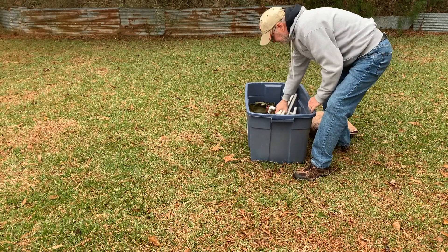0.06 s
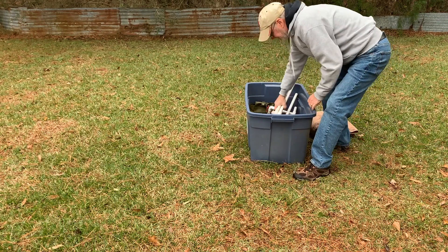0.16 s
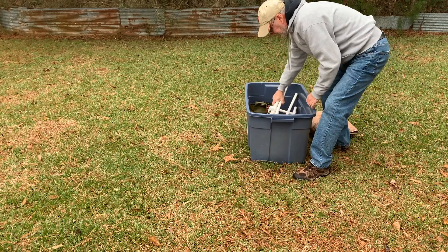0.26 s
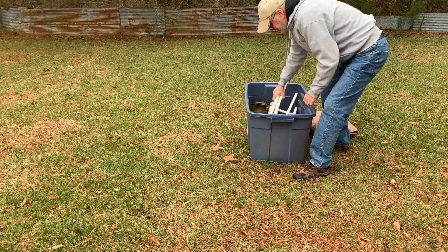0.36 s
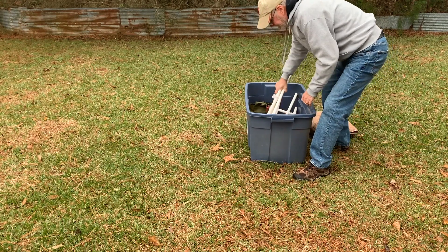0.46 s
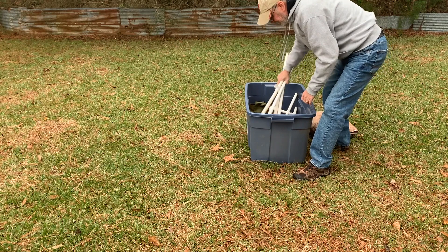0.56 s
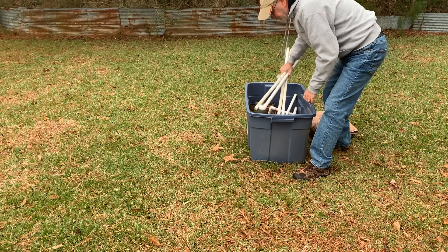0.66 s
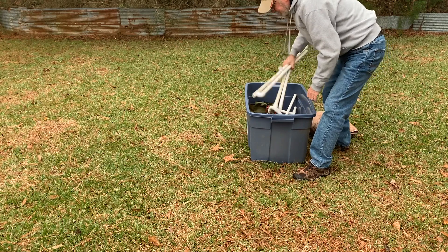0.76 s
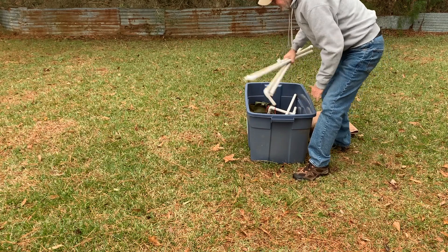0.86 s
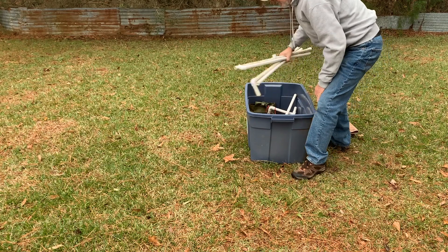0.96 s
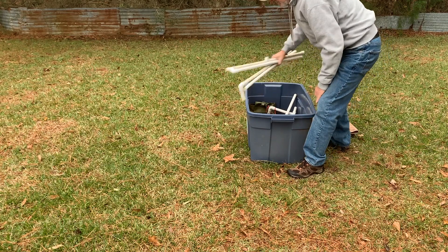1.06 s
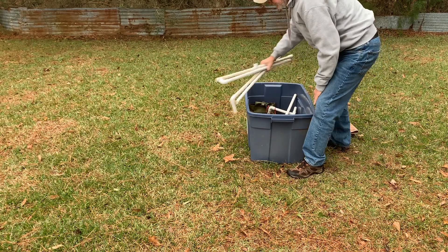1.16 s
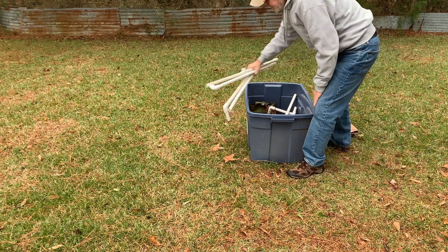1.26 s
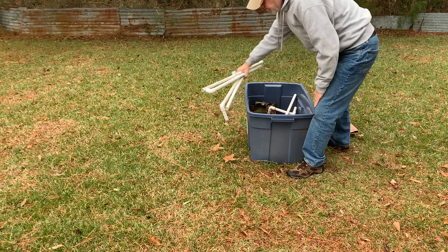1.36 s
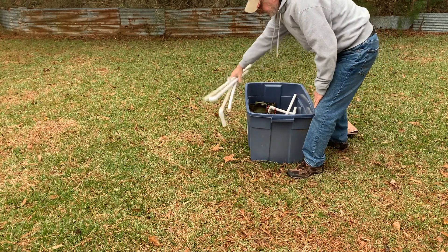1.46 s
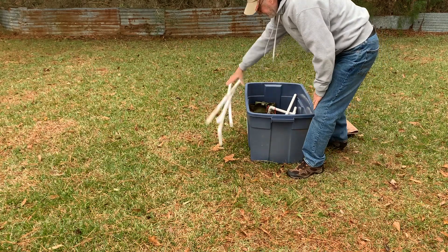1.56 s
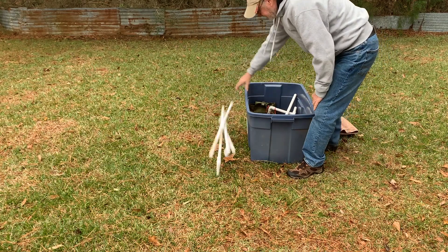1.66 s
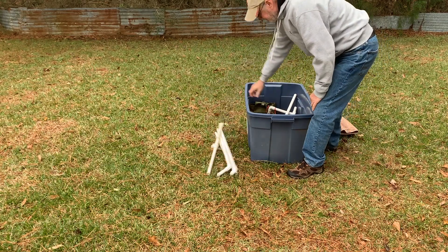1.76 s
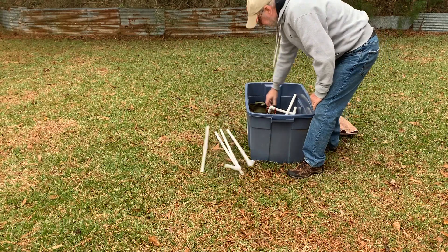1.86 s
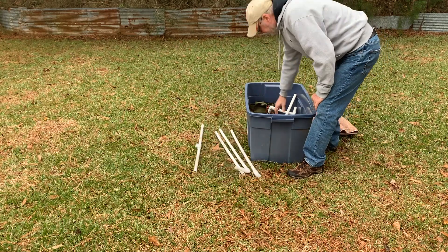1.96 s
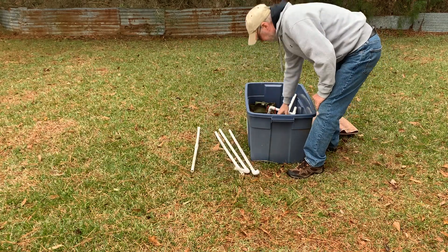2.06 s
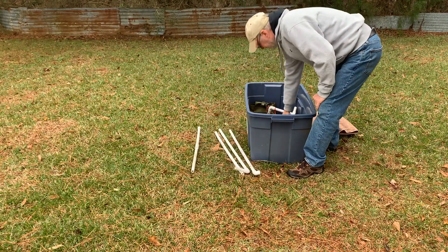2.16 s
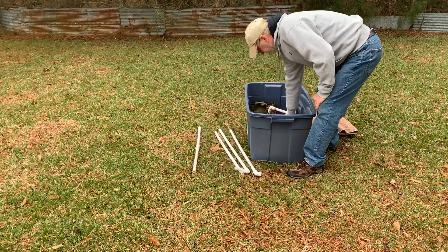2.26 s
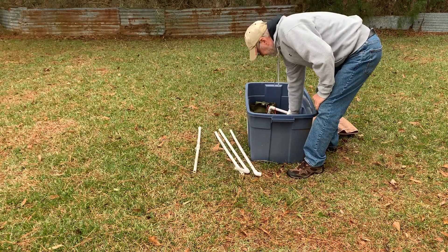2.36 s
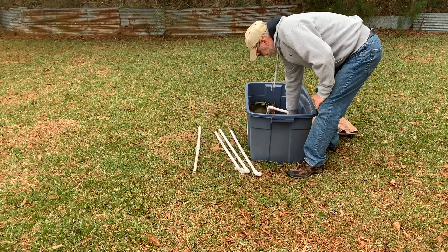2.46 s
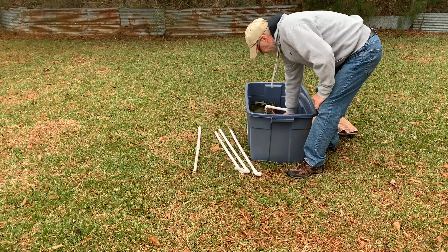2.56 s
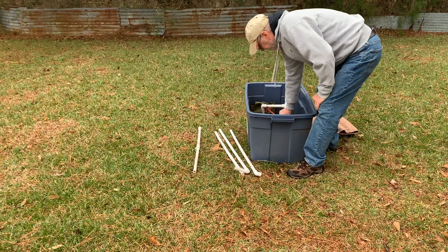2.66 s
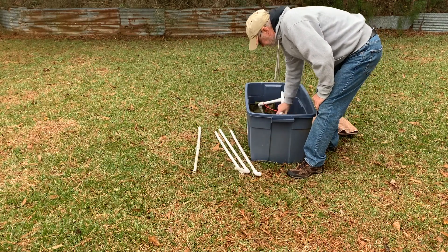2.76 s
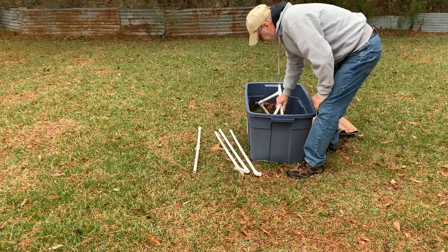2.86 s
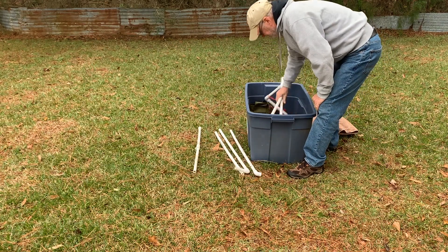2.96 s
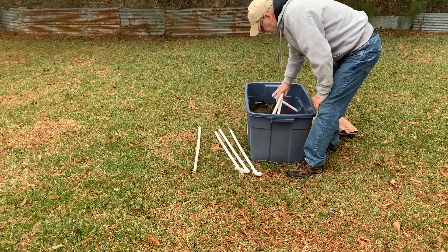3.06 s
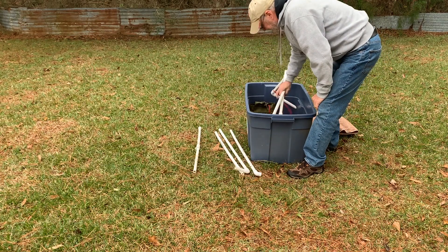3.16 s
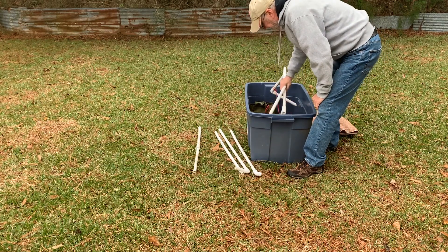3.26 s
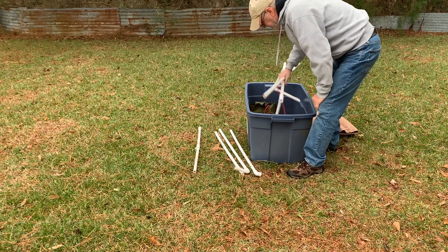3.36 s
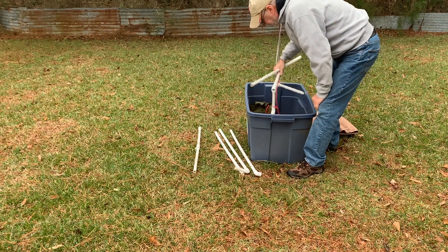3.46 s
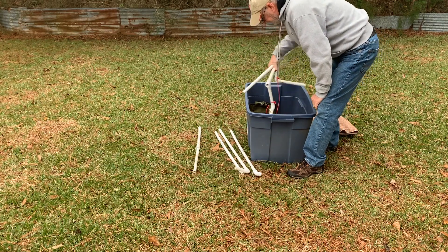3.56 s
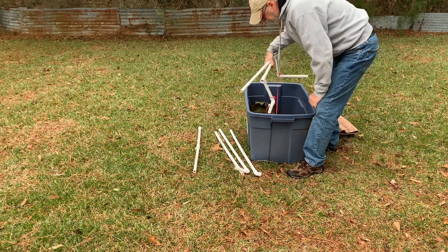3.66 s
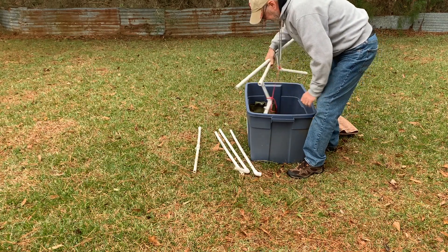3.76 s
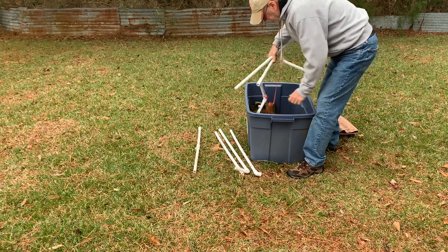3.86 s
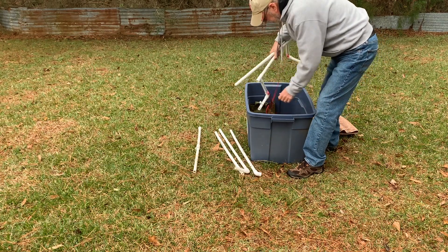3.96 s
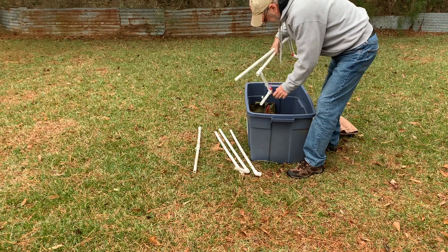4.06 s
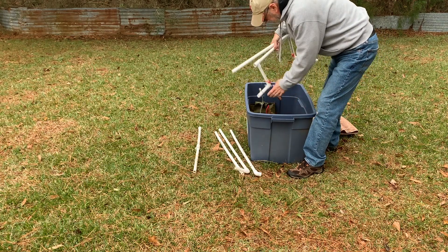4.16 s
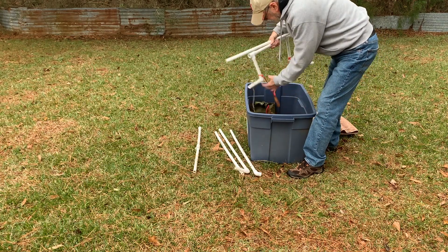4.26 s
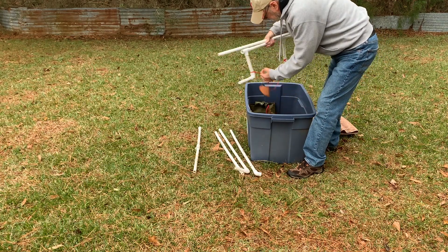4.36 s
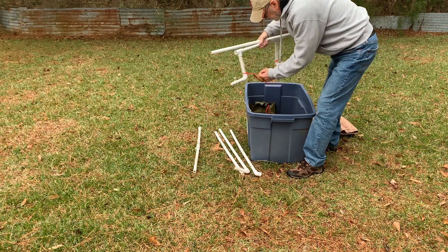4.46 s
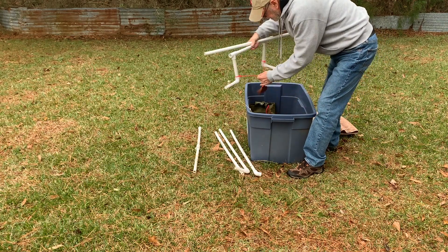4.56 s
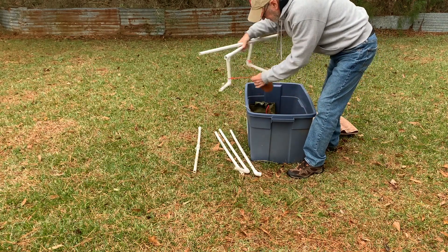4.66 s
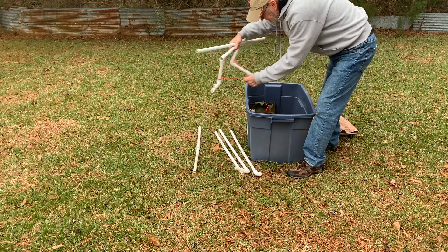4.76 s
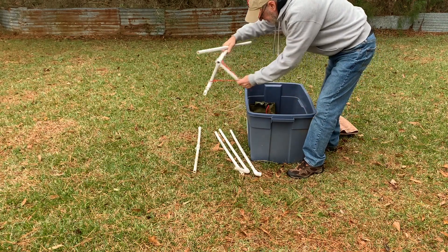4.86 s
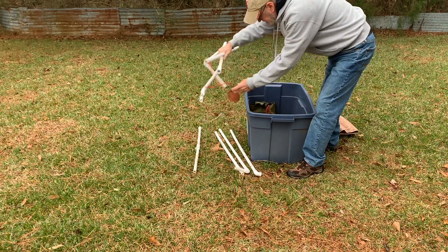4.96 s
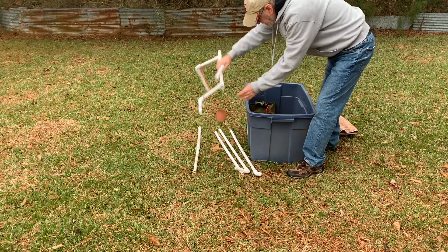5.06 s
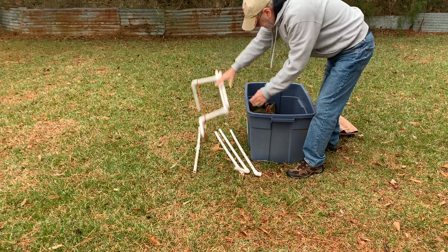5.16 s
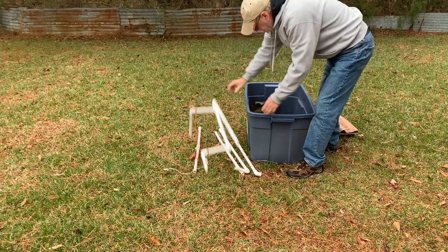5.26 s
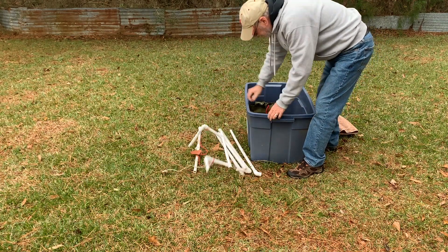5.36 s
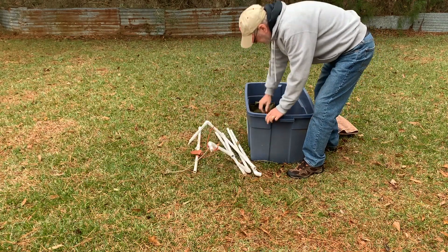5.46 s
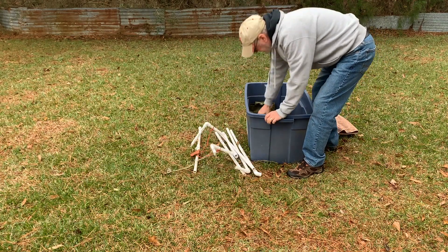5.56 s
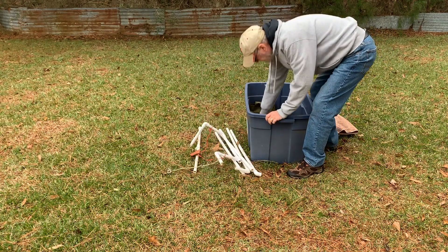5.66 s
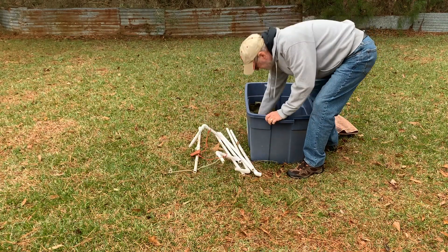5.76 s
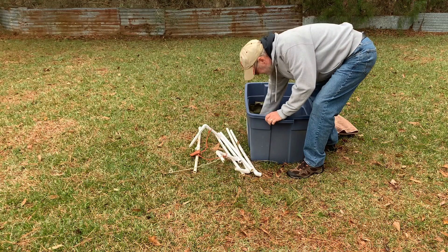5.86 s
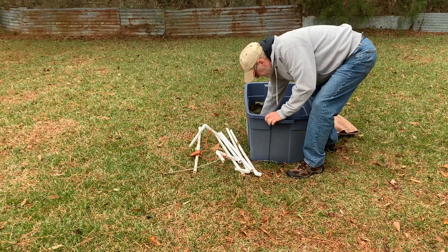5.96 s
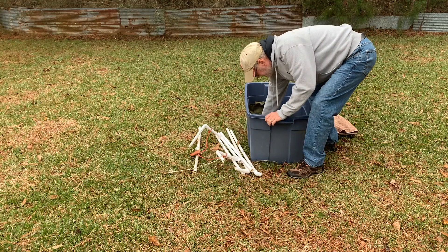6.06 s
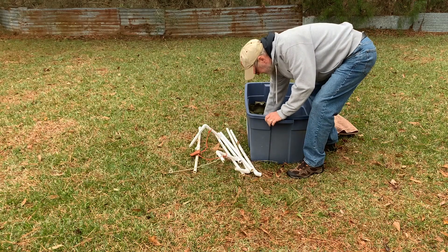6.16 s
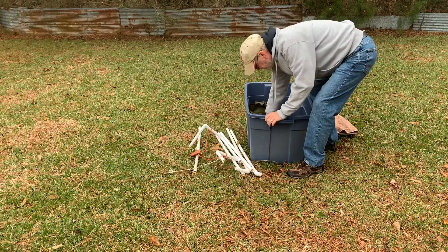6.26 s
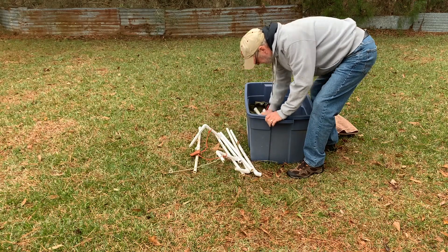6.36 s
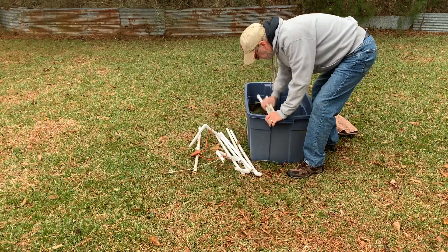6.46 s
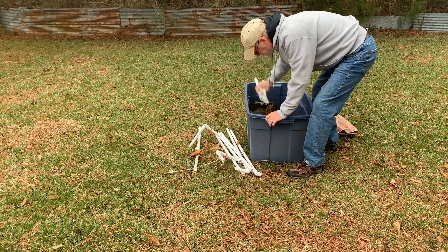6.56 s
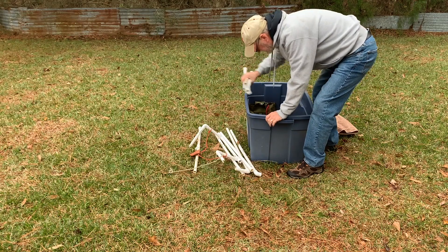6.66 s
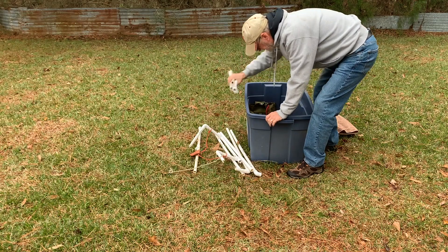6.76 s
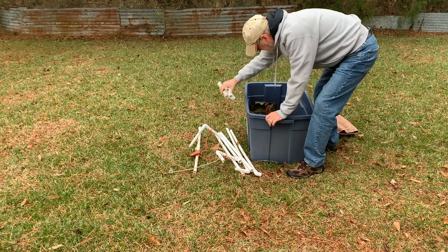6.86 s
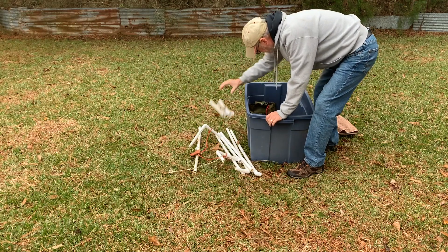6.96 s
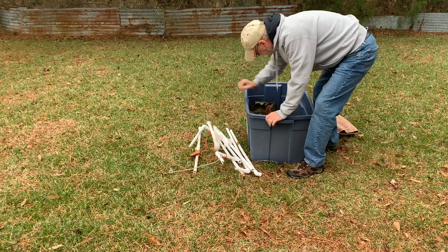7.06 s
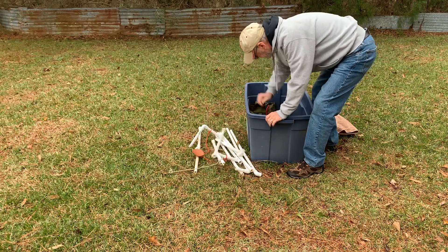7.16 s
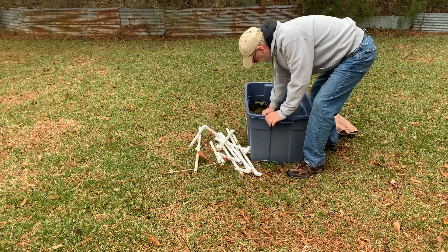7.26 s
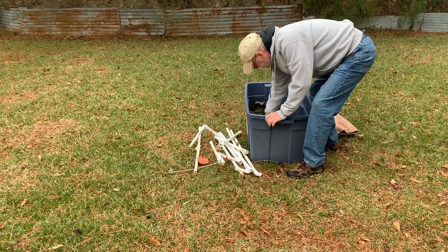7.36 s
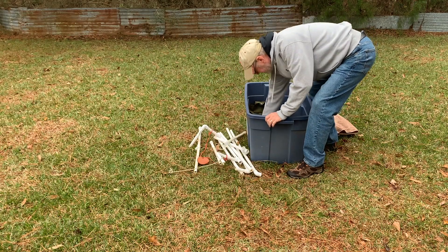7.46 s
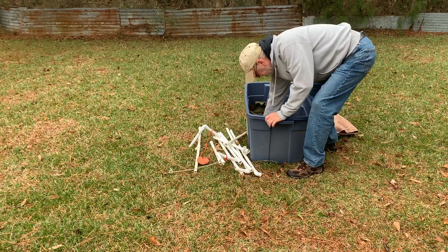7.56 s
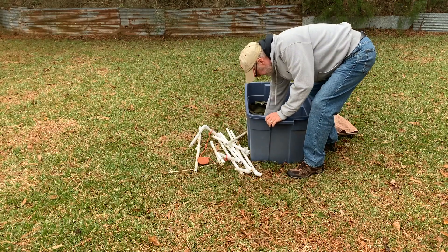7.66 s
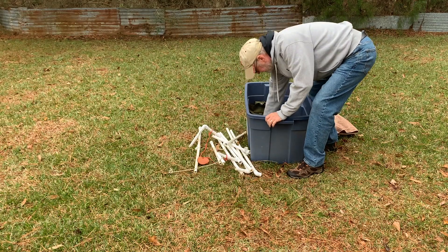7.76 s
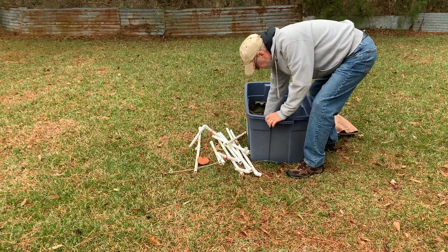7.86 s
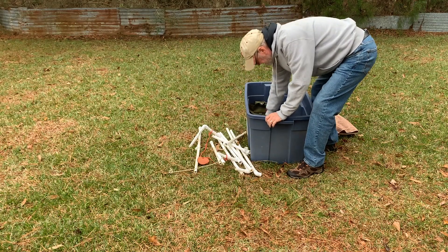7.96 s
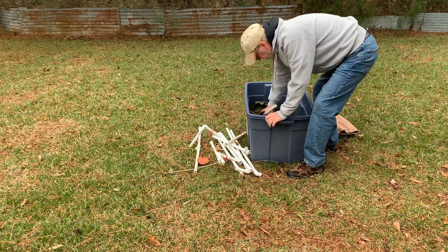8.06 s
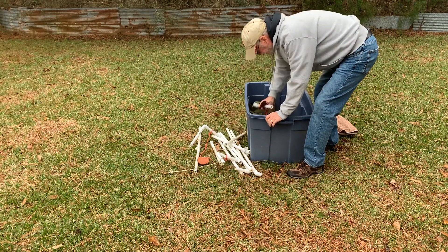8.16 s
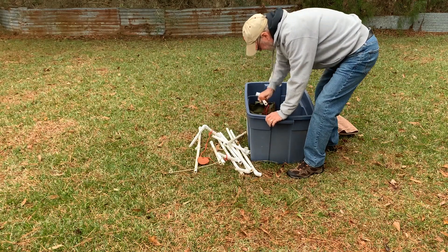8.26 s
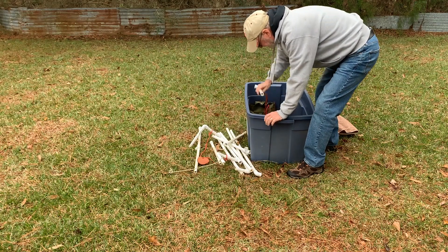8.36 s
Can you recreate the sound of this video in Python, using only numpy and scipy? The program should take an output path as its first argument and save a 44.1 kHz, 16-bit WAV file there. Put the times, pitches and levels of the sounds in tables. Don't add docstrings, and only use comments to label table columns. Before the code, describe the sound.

Plastic pipes clack and scrape inside a booming plastic tub, then three tosses clatter onto a lawn in a quiet yard with faint bird whistles.

```python
import sys
import numpy as np
from scipy import signal
from scipy.fft import rfft, irfft, next_fast_len
from scipy.io import wavfile

SR = 44100
rng = np.random.default_rng(int(sys.argv[2]) if len(sys.argv) > 2 else 0)


def gain_from_decibels(decibels):
    exponent = np.asarray(decibels, float) / 20
    return 10 ** exponent


def dump_mix(stems):
    frames = np.atleast_2d(stems).T
    limited = np.clip(frames, -1, 1)
    pcm = np.round(limited * 32767).astype(np.int16)
    wavfile.write(sys.argv[1], SR, pcm)


N = 371763
LEFT_RIGHT = np.array([[1], [-1]])


def rms_one(x):
    return x / np.sqrt(np.mean(x ** 2) + 1e-20)


def at_hz(points, hz):
    p = np.array(points, float)
    return np.interp(np.log(hz + 10), np.log(p[:, 0] + 10), p[:, 1])


def band(x, low_hz, high_hz, order=2):
    return signal.sosfilt(signal.butter(order, [low_hz, high_hz], "band", fs=SR, output="sos"), x)


def ring(x, hz, t60_s):
    r = gain_from_decibels(-60 / (max(t60_s, 1e-3) * SR))
    w = 2 * np.pi * hz / SR
    return signal.lfilter([0, np.sin(w)], [1, -2 * r * np.cos(w), r * r], x + 1e-18)


def drift(rate_hz):
    r = np.exp(-80 * np.pi * rate_hz / SR)
    white = rng.standard_normal(N // 40 + 2002)
    slow = signal.lfilter([1], [1, -2 * r, r * r], white)[2000:]
    return np.interp(np.arange(N) / 40, np.arange(len(slow)), rms_one(slow))


def swells(rows):
    t = np.arange(0, N + 64, 64) / SR
    level = sum(gain_from_decibels(db) * np.exp(-((t - s) / half_s) ** 2) for s, half_s, db in rows)
    return np.interp(np.arange(N) / SR, t, level)


def grains(per_s, size_db, smooth):
    sizes = gain_from_decibels(size_db * np.minimum(rng.exponential(1, N), 4)) * rng.choice([-1, 1], N)
    hits = rng.random(N) < per_s * gain_from_decibels(5 * drift(30)) / SR
    return rms_one(sizes * hits) + smooth * rng.standard_normal(N)


def add(out, s, piece):
    i = max(round(s * SR), 0)
    out[..., i:i + piece.shape[-1]] += piece[..., :N - i]


# (frequency [Hz], density [dB per Hz])
HUM = [(15, -36), (25, -14.5), (60, 1), (191, -18), (431, -25.5), (782, -31), (1380, -37.5), (8500, -43),
       (10300, -27.5), (16300, -48.5)]
# (frequency [Hz], likeness [0-1])
HUM_LIKENESS = [(60, 1), (200, 0.35), (600, 0.16), (2000, 0.077), (6000, 0.9), (15000, 0.9)]


def air():
    out, together = 0, drift(0.2)
    edges_hz = 25 * 2 ** np.arange(0, 9.6, 2 / 3)
    for low, high in zip(edges_hz, edges_hz[1:]):
        mid, side = band(rng.standard_normal((2, N)), low, high)
        hz = np.sqrt(low * high)
        alike = np.clip(at_hz(HUM_LIKENESS, hz), 0, 1)
        patchy_db = 1.1 * (0.6 * together + drift(8))
        stereo = np.sqrt(1 + alike) * mid + np.sqrt(1 - alike) * side * LEFT_RIGHT
        out = out + gain_from_decibels(at_hz(HUM, hz) + patchy_db) * stereo
    return gain_from_decibels(-54.5) * rms_one(out)


# (frequency [Hz], t60 [s])
YARD_T60 = [(100, 0.36), (400, 0.5), (700, 0.3), (2200, 0.34), (6000, 0.34), (16000, 0.13)]


def yard(x):
    t, tail = np.arange(SR // 2) / SR, 0
    edges_hz = 100 * 2 ** np.arange(0, 7.6, .5)
    for low, high in zip(edges_hz, edges_hz[1:]):
        white = rng.standard_normal((2, len(t))) + 17 * rng.standard_normal((1, len(t)))
        tail = tail + band(white, low, high) * gain_from_decibels(-60 * t / at_hz(YARD_T60, low))
    first_s = 0.0038
    tail = tail * np.clip(t / first_s, 0, 1) / np.sqrt(np.sum(tail ** 2) / 2)
    return signal.fftconvolve(x[None], tail, axes=1)[:, :N]


# (time [s], pitch [Hz], level [dB])
BIRD_CALLS = [
    [(3.06, 2800, -67), (3.19, 2770, -62), (3.27, 2690, -73.5)],
    [(3.17, 2590, -66), (3.24, 2540, -67.5), (3.32, 2560, -70), (3.45, 2650, -77)],
    [(7.05, 3510, -84.5), (7.075, 3940, -68.5), (7.1, 4240, -57)],
]


def bird():
    out = np.zeros(N)
    for call in BIRD_CALLS:
        s, hz, db = np.transpose(call)
        t = np.arange(s[0], s[-1], 1 / SR)
        flutter = 0.8 + 0.7 * rms_one(band(rng.standard_normal(len(t)), 30, 200))
        pitch_hz = np.interp(t, s, hz) * (1 + 0.01 * (flutter - 0.8))
        whistle = np.sin(2 * np.pi * np.cumsum(pitch_hz) / SR)
        add(out, s[0], gain_from_decibels(np.interp(t, s, db)) * flutter * whistle)
    return out


# (middle [s], half length [s], level [dB])
RUSTLE_SWELLS = [(0.075, 0.059, -57), (0.411, 0.027, -52.5), (0.995, 0.045, -55), (1.073, 0.034, -44.5),
                 (5.315, 0.019, -50), (1.741, 0.017, -44.5), (1.923, 0.085, -38.5), (2.035, 0.078, -52),
                 (2.7, 0.031, -61), (2.8, 0.04, -52), (2.87, 0.02, -52), (2.93, 0.051, -56),
                 (3.046, 0.041, -55.5), (3.492, 0.021, -52.5), (3.56, 0.023, -55.5), (4.518, 0.035, -74),
                 (5.261, 0.015, -54.5), (5.355, 0.004, -44.5), (5.53, 0.08, -41.5), (1.314, .008, -61),
                 (5.84, .02, -51.5), (3.15, 0.041, -63.5)]


def rustles():
    grain = grains(5000, 2.5, smooth=1)
    crackle = band(grain, 8900, 12500) - band(grain, 12500, 17000)
    crackle = crackle - gain_from_decibels(-4) * band(grain, 4500, 8800, order=1)
    for low_hz in (1600, 2500, 3800):
        crackle = crackle + gain_from_decibels(-6 + 5 * drift(30)) * band(grain, low_hz, 1.5 * low_hz, order=1)
    crackle = rms_one(crackle)
    stereo = crackle + 0.05 * np.roll(crackle, 999) * LEFT_RIGHT
    return swells(RUSTLE_SWELLS) * gain_from_decibels(2.5 * drift(40)) * stereo


# (frequency [Hz], level [dB], t60 [s])
TUB_MODES = [(53, -15, 0.12), (82.7, -3, 0.25), (115, -5, 0.23), (134, -5.5, 0.14), (151, -3, 0.2),
             (178, -5.5, 0.14), (194.2, 3, 0.13), (221, -7, 0.21), (254.7, -3, 0.13), (308, -9.5, 0.21),
             (339, -2, 0.061)]
# (frequency [Hz], level [dB], t60 [s])
RIM_MODES = [(380, 0, .07), (470, 0, .06), (560, -1, .05), (650, -2, .045), (760, -3, .04), (880, -3, .035),
             (1040, -2, .035), (1230, -5, .03), (1450, -8, .025), (1800, -13, .02), (2700, -21, .012),
             (4000, -25, .01)]
# (middle [s], half length [s], level [dB])
SLIDE_STROKES = [(.11, 0.1, -38), (.29, .1, -56), (.51, 0.099, -38.5), (.8, .14, -45.5),
                 (1.1, 0.045, -58.5), (1.89, .11, -45), (2.65, 0.14, -54), (2.82, 0.064, -53.5),
                 (3.11, 0.23, -54), (3.41, 0.083, -57.5), (3.58, 0.078, -53), (5.46, .07, -34.5),
                 (5.74, 0.14, -43), (.62, .05, -50), (.21, .04, -52.5), (6.16, 0.036, -57.5),
                 (6.1, 0.061, -53), (7.27, 0.11, -35), (7.66, 0.12, -49.5), (7.94, 0.087, -55)]


def handling():
    scrape, t = swells(SLIDE_STROKES), np.arange(N) / SR
    rubbing = scrape * grains(500, 3, smooth=0.5)
    slips = band(rubbing, 40, 1800, order=1)
    walls, rim = (sum(gain_from_decibels(db) * ring(slips, f, t60) / np.sqrt(t60) for f, db, t60 in modes)
                  for modes in (TUB_MODES, RIM_MODES))
    inside = (t < 1.05) | ((t > 2.4) & (t < 3.8)) | ((t > 5.85) & (t < 6.3)) | (t > 7.5)
    rumble = gain_from_decibels(6.5) * rms_one(inside * walls)
    grit = gain_from_decibels(-17) * rms_one(band(rubbing, 1100, 4500, order=1))
    plastic = rumble + (0.62 - 0.25 * inside) * rms_one(rim) + grit
    return plastic * np.sqrt(np.mean(scrape ** 2))


def strike_modes(out, s, modes, tilt_db, total_db, bounce_s=None):
    f, level_db, t60 = np.transpose(modes)
    scatter, delay, again = rng.standard_normal((3, len(f)))
    share = gain_from_decibels(level_db + tilt_db(f) + 5 * scatter)
    share *= gain_from_decibels(total_db) / np.linalg.norm(share)
    start_s = s + 2.4 / (f + 60) * (1 + 0.2 * delay) - 0.003
    for k in range(len(f)):
        click = 1. * (np.arange(int(1.4 * t60[k] * SR)) == 0)
        soft = band(click, 0.21 * f[k], 2.9 * f[k], order=1)
        mode = share[k] * (-1) ** k * ring(soft, f[k], t60[k])
        add(out, start_s[k], mode)
        if bounce_s is not None:
            add(out, start_s[k] + bounce_s, gain_from_decibels(-3) * again[k] * mode)


def thumps(rows):
    out = np.zeros(N)
    for s, boom_db, hz, rim_db in rows:
        strike_modes(out, s, TUB_MODES, lambda f: -5 * np.abs(np.log2(f / hz)), boom_db + 3)
        strike_modes(out, s, RIM_MODES, lambda f: -6.5 * np.log2(f / 500), rim_db - 4,
                     bounce_s=rng.uniform(.004, .016))
    return out


# (time [s], knock [dB])
TURF_THUDS = [
    (1.751, -12),
    (1.779, -12.5),
    (5.605, -28.5),
    (5.635, -22.5),
    (7.1061, -16.5),
    (7.125, -18),
    (7.156, -16),
    (7.185, -15),
    (7.217, -26.5),
]


def thuds():
    return thumps([(s, db - 11.5, 231, db) for s, db in TURF_THUDS])


# (time [s], wall boom [dB], strongest wall
# mode [Hz], rim knock [dB])
TUB_BLOWS = [(.04, -34.5, 167.7, -22.5), (.089, -17.5, 140, -23), (.105, -23, 177.8, -35),
             (.12, -20.5, 145.4, -14), (.148, -25.5, 128, -16), (.285, -25.5, 226.7, -35.5),
             (.314, -27.5, 152.7, -27.5), (.426, -32.5, 197.6, -25), (.453, -25.5, 187, -22),
             (.474, -12, 172, -13), (.485, -8, 148.7, -12), (.526, -17, 218.3, -22.5),
             (.551, -13.5, 217.9, -11.5), (.577, -14, 219, -19.5), (.691, -11, 193.4, -13.5),
             (.742, -25, 207, -16.5), (.837, -33.5, 122.3, -29), (.897, -17, 149.8, -14.5),
             (.94, -26.5, 147, -27.5), (1.974, -9.5, 148.2, -15), (2.346, -37, 129, -37.5),
             (2.526, -31.5, 285, -21.5), (2.549, -18, 270, -20.5), (2.701, -30, 158, -33),
               (2.744, -21.5, 200, -29.5), (2.781, -21, 271, -29), (2.819, -38, 137, -24),
               (2.866, -26.5, 109.2, -31.5), (3.004, -31.5, 217.4, -39), (3.112, -7, 178, -13),
               (3.325, -21.5, 145.7, -27.5), (3.37, -12.5, 178, -25), (3.471, -20, 189, -23.5),
               (3.486, -14, 171.5, -23.5), (3.535, -28, 178, -20.5), (3.576, -25, 150, -29.5),
               (3.611, -38, 178, -24), (4.471, -29, 339, -27.5),
             (5.383, -19.5, 196, -19.5), (5.747, -24.5, 220, -22), (5.865, -20, 222.6, -24.5),
                (6.035, -34.5, 211, -33), (6.083, -28.5, 158.8, -28), (7.28, -5.5, 193.8, -14),
                (7.317, -15, 197, -15.5), (7.541, -17, 203.3, -23.5), (7.598, -25, 135.5, -22.5),
                (7.665, -27.5, 170, -23.5), (7.712, -23.5, 221, -27), (7.751, -17.5, 143.6, -15),
                (7.872, -15.5, 184.4, -20.5), (7.904, -30.5, 178, -25.5), (7.955, -17, 150, -29),
                (7.3, -14, 153, -37),
             (.6, -25, 200, -32),
    (.902, -24, 280, -31),
    (4.473, -36, 339, -41),
    (5.36, -22, 195, -36),
    (5.94, -35.5, 221, -38.5),
    (6.108, -33, 178, -41.5),
    (6.127, -29, 221, -41.5),
    (6.147, -31, 195, -48),
    (6.172, -41, 190, -46),]


def tub_blows():
    return thumps(TUB_BLOWS)


# (time [s], peak [dB], air column [Hz])
PIPE_TICKS = [
    (1.643, -48, 1390),
    (1.696, -53, 1410),
    (6.95, -54, 1195),
]


def ticks():
    out, click = np.zeros(N), np.arange(4000) == 0
    for s, db, hz in PIPE_TICKS:
        for ratio, below_db, t60_s in ((1, 0, .06), (1.52, -7, .04), (2.05, -9, .03)):
            add(out, s, gain_from_decibels(db + below_db) * ring(click, ratio * hz, t60_s))
    return out


def pipe_wall(shake, hz, pitch_chance, size_chance):
    lowest_hz = min(0.88 * hz, 1450)
    spread = np.exp(0.15 * pitch_chance)
    spread[0] = 1
    pitches = np.clip(hz * spread, lowest_hz, 4200)
    pitches[1] = min(1550, 2.7 * hz) * np.exp(0.02 * pitch_chance[1])
    wall = 0
    for k, f in enumerate(pitches):
        wall = wall + gain_from_decibels(3 * size_chance[k] - 5 * (k > 0)) * ring(shake, f, 7.4 / f)
    return band(wall, 0.78 * lowest_hz, min(2.4 * hz, 8000))


def pipe_crack(hiss, ring_db, crack_db, treble_db):
    body = gain_from_decibels(3.5 + 0.31 * np.clip(ring_db - crack_db, -25, 10)) * band(hiss, 2600, 3500)
    top = gain_from_decibels(6 + 0.071 * crack_db) * band(hiss, 12000, 15000)
    treble = gain_from_decibels(5) * band(hiss, 8200, 11000) - top
    return body - band(hiss, 4300, 8200) + gain_from_decibels(treble_db) * treble


def clacks(rows):
    out, t = np.zeros((2, N)), np.arange(2048) / SR
    rise = np.minimum(t / 0.0003, 1)
    for s, ring_db, hz, crack_db, chatter_ms, treble_db in rows:
        shake, mid, side = rng.standard_normal((3, len(t)))
        pitch_chance, size_chance = rng.standard_normal((2, 6))
        length_s = np.clip(chatter_ms / 1000, 5e-4, .02)
        chatter = rise * np.exp(-(t / length_s) ** 2)
        snap = rise * np.exp(-(t / (0.83 * length_s)) ** 2) + 0.21 * np.exp(-t / 0.0067)
        wall = pipe_wall(shake * chatter, hz, pitch_chance, size_chance)
        crack = pipe_crack((mid + 0.14 * side * LEFT_RIGHT) * snap, ring_db, crack_db, treble_db)
        sound = gain_from_decibels(ring_db + 0.5) * wall / np.abs(wall).max()
        sound = sound + gain_from_decibels(crack_db + 5) * crack / np.abs(crack).max()
        place = gain_from_decibels(0.6 * size_chance[0] * LEFT_RIGHT)
        add(out, s - 5e-4, sound * place)
    return out


# (time [s], ring [dB], ring [Hz])
PIPE_TAPS = [(.052, -25, 936), (.068, -30, 1010), (.187, -31.5, 705), (.349, -41, 721), (0.391, -43.5, 964),
             (.529, -26.5, 810), (.587, -25, 1300), (.6, -35, 1290), (.747, -24.5, 1160), (.876, -52, 684),
             (1.049, -45, 2100), (2.532, -33.5, 843), (2.562, -37.5, 1500), (2.605, -40, 827),
             (2.616, -50, 1050), (2.645, -46.5, 1052), (2.665, -41.5, 915), (2.693, -48.5, 1504),
             (2.744, -45, 661), (2.785, -40, 900), (2.81, -45, 1375), (2.875, -45, 990), (2.965, -56, 980),
             (3.043, -42, 926), (3.134, -39, 1900), (3.194, -49, 898), (3.495, -37, 898), (3.625, -46, 794),
             (5.938, -40.5, 699), (6.125, -53, 947), (7.583, -35.5, 830), (7.625, -60, 1380),
             (7.694, -55, 1500), (7.73, -40, 800), (7.741, -46, 1595), (7.782, -47, 998), (7.929, -58, 895),
             (7.978, -45.5, 1304),
             (1.787, -14.5, 620),
    (1.974, -18.5, 1003),
    (3.471, -30.5, 991),
    (5.407, -6, 3100),
    (6.085, -38.5, 894),
    (7.107, -19, 783),
    (7.185, -17, 755),
]


def taps():
    return clacks([(s, db, hz, db - 32, 7, 0) for s, db, hz in PIPE_TAPS])


# (time [s], wall ring [dB], crack [dB], crack brightness [dB], chatter [ms])
TUB_KNOCKS = [(0.0424, -20.5, -30.5, -4, 3.2), (.0427, -26.5, -32, -15, 7.9), (.06, -26, -38.5, -7.5, 8.1),
              (.072, -24, -41, -13, 13), (0.1177, -43, -39, -16.5, 7.1), (0.1477, -22.5, -37, -13, 12),
              (0.4217, -26, -44, -6, 11), (0.4867, -16, -33.5, -3, 11.3), (0.5509, -20.5, -49, -12, 4.9),
              (.578, -23, -28.5, -11, 9.2), (0.6732, -31, -36, -10, 4.9), (0.6918, -23.5, -32.5, -12, 5.8),
              (0.7194, -42, -43, 1, 3.9), (0.7702, -35, -28, -1, 7.8), (.897, -26.5, -40, -4.5, 9.9),
              (1.9726, -17.5, -22, -2.5, 7.3), (2.5252, -52, -49.5, -5, 24), (2.7605, -33, -41, -6, 9.4),
              (3.107, -21.5, -30.5, -14.5, 7.4), (3.3716, -27, -44, -16, 3.7), (3.4699, -44, -52, -3, 4),
              (3.488, -38, -53, -10.5, 4), (3.5362, -49, -37.5, -15, 10), (4.471, -35, -55.5, -14.5, 5.2),
              (5.608, -28.5, -62, -14, 3.3), (5.639, -28.5, -45, -8, 5.4), (6.085, -35, -55, -4.5, 5),
              (7.2801, -15.5, -28, -3, 5.9), (7.5479, -38.5, -43, -5, 6), (7.6, -44, -51, -11, 8),
              (7.7522, -30.5, -47, -19, 3.8), (7.87, -46.5, -60, -14, 4), (7.882, -49, -60, -12, 3.7),
              (7.956, -48, -50.5, -17, 3.3)]


def knocks():
    return clacks([(s, db, 1034, crack_db, ms, treble_db)
                   for s, db, crack_db, treble_db, ms in TUB_KNOCKS])


# (time [s], wall ring [dB])
HEAP_RATTLES = [(1.906, -31), (1.9174, -29), (1.838, -29), (1.848, -33), (1.943, -37), (5.6868, -23.5),
                (5.691, -24), (5.7, -27.5), (5.7097, -27.5), (5.718, -32), (5.735, -32), (5.7463, -32),
                (5.767, -24.5), (5.828, -29), (5.8375, -26), (5.846, -37.5), (7.3242, -26)]
# (time [s], wall ring [dB])
FITTING_HOPS = [
    (7.342, -35.5),
    (7.3675, -25),
    (7.3917, -30.5),
    (7.4111, -31),
    (7.428, -43),
    (7.4385, -41),
    (7.456, -44),
]


def rattles():
    small = [(s, db, 1800, db - 7.5, 3, -5) for s, db in HEAP_RATTLES]
    hops = [(s, db, 1800, db - 14.5, 3, -5) for s, db in FITTING_HOPS]
    return clacks(small + hops)


# (time [s], wall ring [dB], wall ring [Hz], crack [dB], chatter [ms])
TOSS_STRIKES = [(0.286, -30, 3710, -46, 7.3), (0.442, -26.5, 4075, -15, 7.5),
                (0.738, -19.5, 3460, -21, 8.8), (1.728, -48.5, 3986, -36, 4.2),
                (1.7509, -5.5, 2522, -8, 2.3), (1.7545, -12, 1609, -11, 1.6), (1.7685, -25.5, 2998, 2, 1.6),
                (1.773, -1, 2580, -1.5, 3.8), (1.7802, -11, 2008, -12.5, 3), (1.7849, -7, 2384, -6.5, 4.6),
                (1.79, -10, 1500, -14.5, 9.1), (1.8033, -10.5, 2477, -11.5, 1.8),
                (1.8093, -10.5, 2292, 2.5, 3), (1.8125, -5, 1746, -10, 3), (1.815, -10, 1900, -8.5, 3),
                (1.825, -19, 2947, -17.5, 2.5), (1.8273, -9, 1936, -22.5, 1.5),
                (2.752, -52, 4200, -33.5, 5.4)]
FRAME_LANDING = [(5.362, -30.5, 4220, -6, 2.4), (5.3651, -29, 1492, -17, 1.3),
                 (5.3787, -12, 1609, -4.5, 1.8), (5.387, -20.5, 3196, 1.5, 2.4),
                 (5.3895, -10.5, 3288, -7.5, 2.5), (5.3926, -17, 2190, 0, 1.5), (5.395, -14, 2033, -8.5, 3),
                 (5.4002, -11.5, 2625, -15, 4), (5.4063, -3, 2500, 4.5, 2.8), (5.41, -14, 1680, -10.5, 2.2),
                 (5.4128, -7.5, 2010, -12, 2), (5.4131, -9.5, 2431, -6.5, 2), (5.415, -6.5, 2338, 1.5, 3),
                 (5.425, -12, 1700, -16, 3), (5.432, -16.5, 2006, -16.5, 3), (5.485, -15, 2020, -12, 3.9),
                 (5.511, -22, 1670, -19.5, 3.3), (5.545, -34, 1597, -40, 2.8), (5.6778, -8, 2612, -8.5, 4),
                 (5.8179, -20.5, 2150, -30.5, 3)]
FITTING_SCATTER = [(7.107, -12, 2073, -8, 2.5), (7.1057, -11, 1475, -21.5, 3.4),
                   (7.1126, -16.5, 1289, -26, 5.5), (7.1237, -20, 1203, -28, 4.4),
                   (7.1321, -20, 1214, -17, 1.9), (7.1488, -15, 1890, -23.5, 2),
                   (7.157, -13.5, 2923, -6, 2.2), (7.159, -13.5, 1663, -12.5, 2.134),
                   (7.1625, -14.5, 1294, -7, 4.4), (7.1729, -22.5, 1992, -13, 1.2),
                   (7.1751, -13, 1385, -16, 4), (7.183, -3, 3024, -3.5, 2.5), (7.182, -8, 1315, -2, 4.4),
                   (7.1873, -8, 1602, -9, 1.7), (7.1923, -9.5, 2533, -10, 2.7),
                   (7.2219, -6.5, 2752, -2, 3.7), (7.2253, -15, 2200, -10.5, 2.8),
                   (7.238, -17, 2400, -24, 2.3), (7.2505, -10.5, 2320, -16.5, 2.2),
                   (7.2557, -14.5, 2340, -26, 3), (7.261, -17, 1551, -28.5, 3.4),
                   (7.2667, -18.5, 1570, -32.5, 3.7), (7.3338, -15, 2455, -32, 2.5)]


def strikes():
    return clacks([row + (0,) for row in map(tuple, TOSS_STRIKES + FRAME_LANDING + FITTING_SCATTER)])


def scene():
    tub = thuds() + tub_blows()
    pipes = ticks() + taps() + knocks() + rattles() + strikes()
    to_yard = gain_from_decibels(-15) * band(pipes.mean(axis=0), 950, 18000, order=1) + gain_from_decibels(-30) * band(tub, 50, 600)
    return air() + yard(to_yard) + bird() + rustles() + handling() + tub + pipes


def roll_off(x):
    return signal.sosfilt(signal.butter(12, 16440, fs=SR, output="sos"), x)


# (frequency [Hz], gain [dB])
MIC_COLOUR = [(20, -20.5), (45, -5.5), (3500, 2), (5000, 0.5), (6800, 0), (7700, 4), (8500, 6), (10000, 4),
              (12500, -5.5), (13500, 2), (15000, -3.5), (15700, -3), (15950, -42)]
# (frequency [Hz], left lead [rad])
PORT_LEAD = [(30, .7), (215, .7), (340, .4), (550, -.1), (1380, -.5), (2070, .3), (2750, 1.6), (3450, 1.5),
             (4200, .9), (5000, 1.3), (6200, -.2), (6900, -.7), (8000, -2.85), (8950, -3.45), (11200, -6.4),
             (12900, -9.15), (13900, -9.75), (15200, -12), (16000, -12.5)]
# (frequency [Hz], left minus right [dB])
PORT_LEVEL = [(60, 5.5), (200, 1.5), (500, 2), (1200, 5.5), (2400, 2), (5500, -3.5), (7500, 0), (15000, 0)]


def record(dry):
    size = next_fast_len(N + 4096)
    hz = np.arange(size // 2 + 1) * SR / size
    half = gain_from_decibels(at_hz(PORT_LEVEL, hz) / 2) * np.exp(.5j * at_hz(PORT_LEAD, hz))
    ports = gain_from_decibels(at_hz(MIC_COLOUR, hz)) * [half, 1 / half]
    mix = irfft(rfft(dry, size) * ports, size)[:, :N]
    return roll_off(np.clip(mix, -1, 1))


dry = scene()
out = record(dry)
dump_mix(out)
```